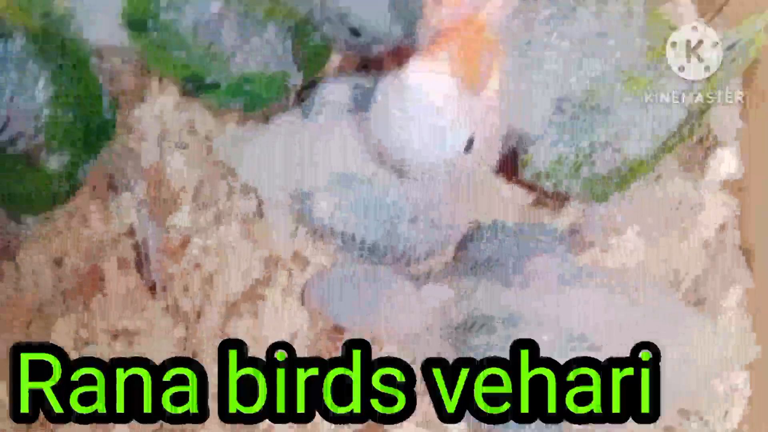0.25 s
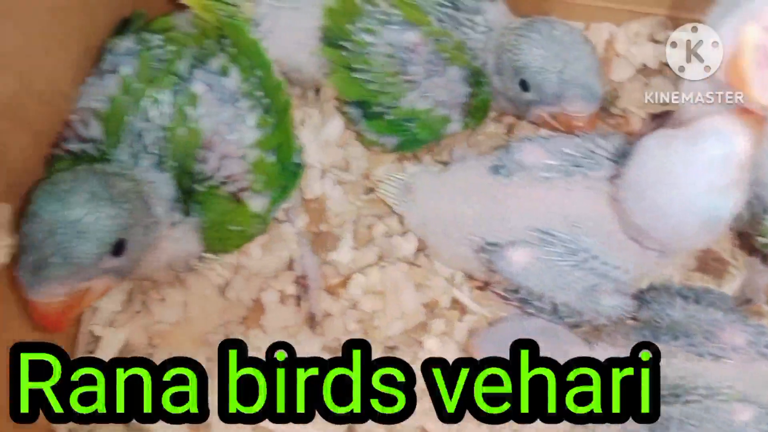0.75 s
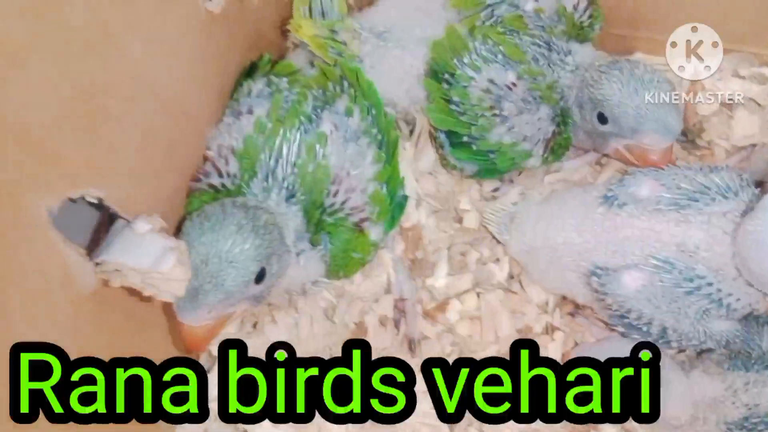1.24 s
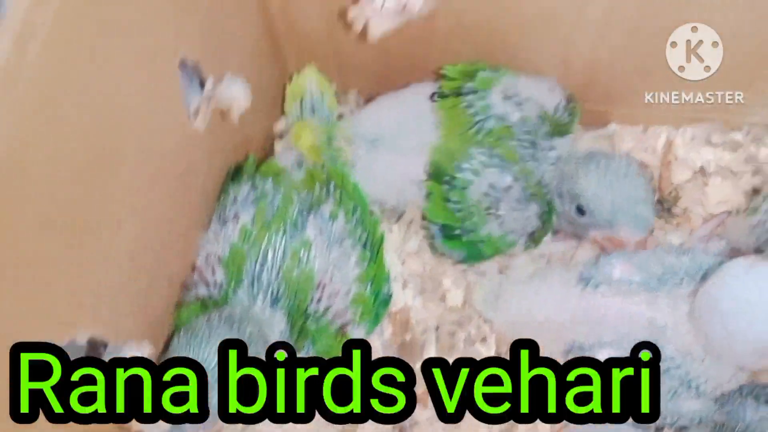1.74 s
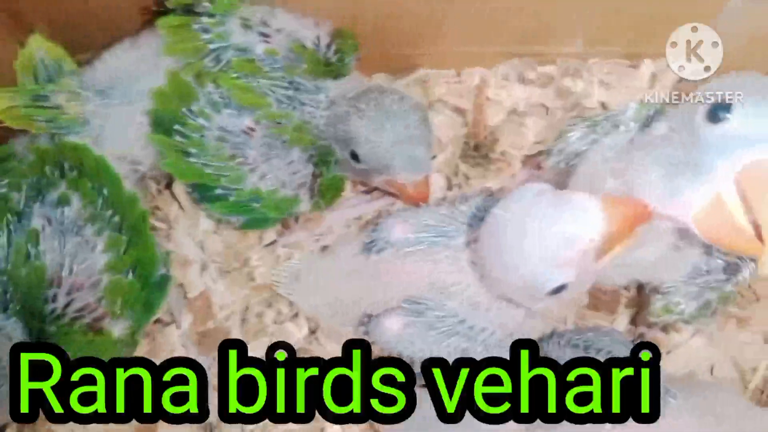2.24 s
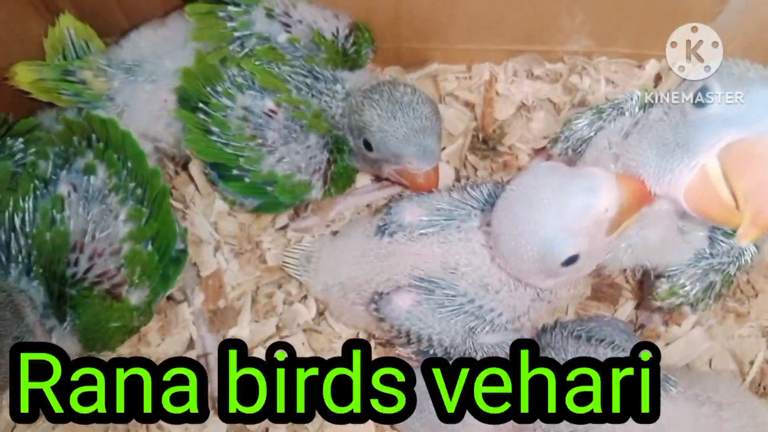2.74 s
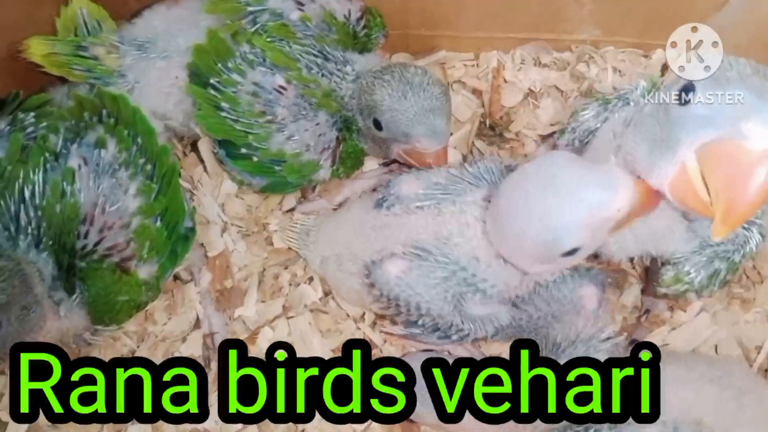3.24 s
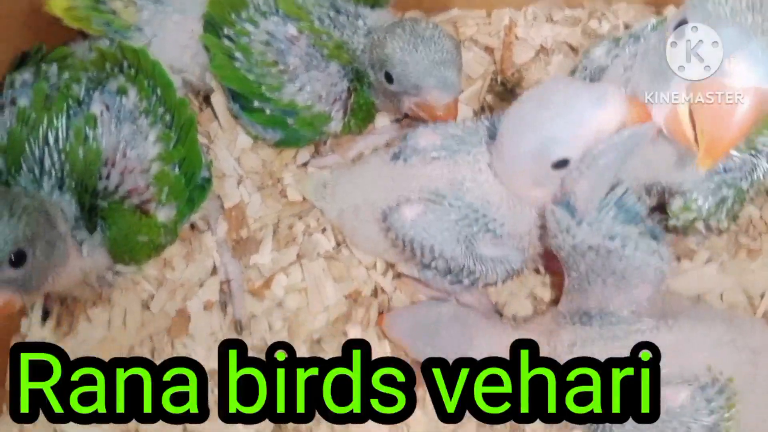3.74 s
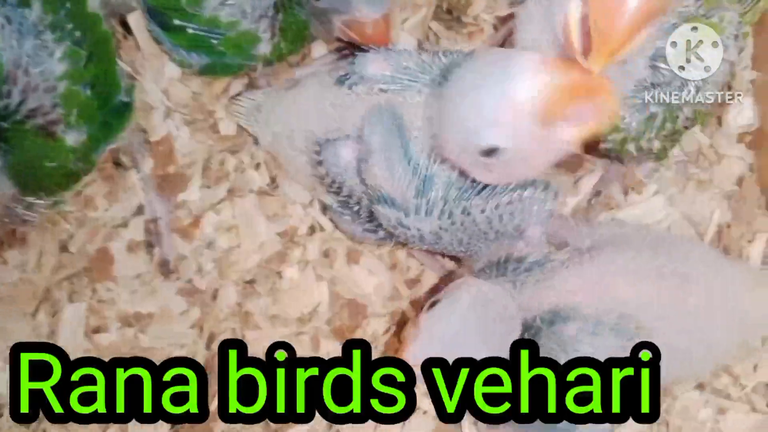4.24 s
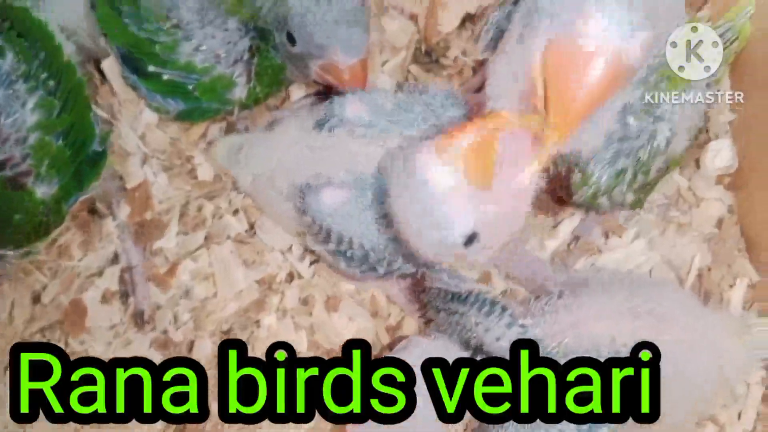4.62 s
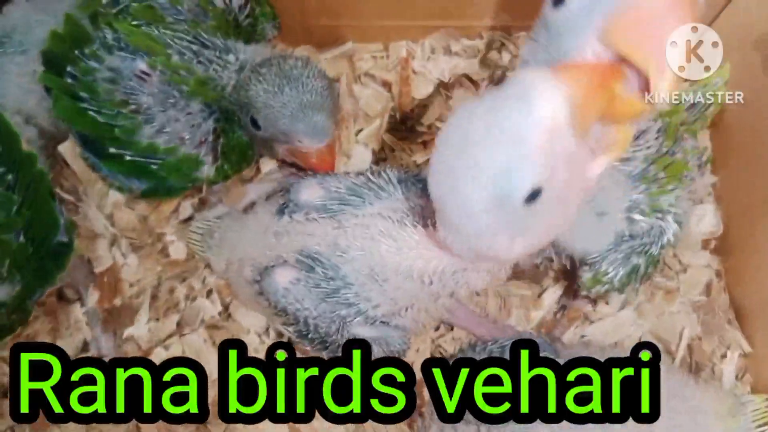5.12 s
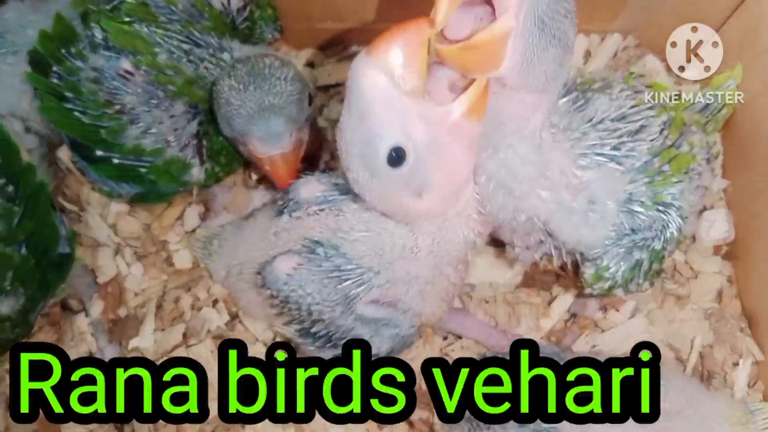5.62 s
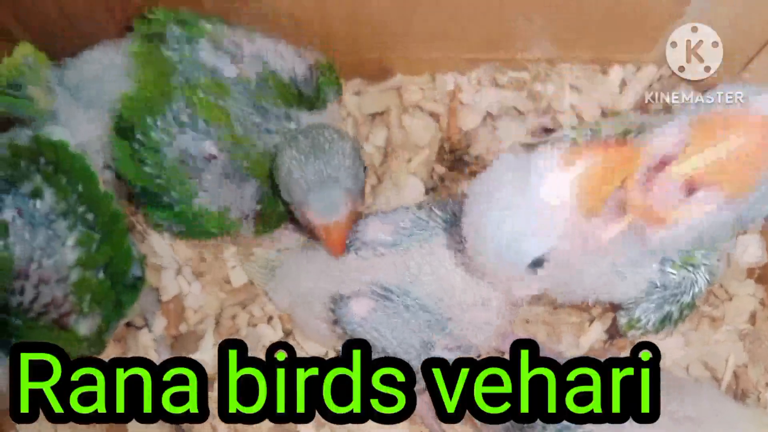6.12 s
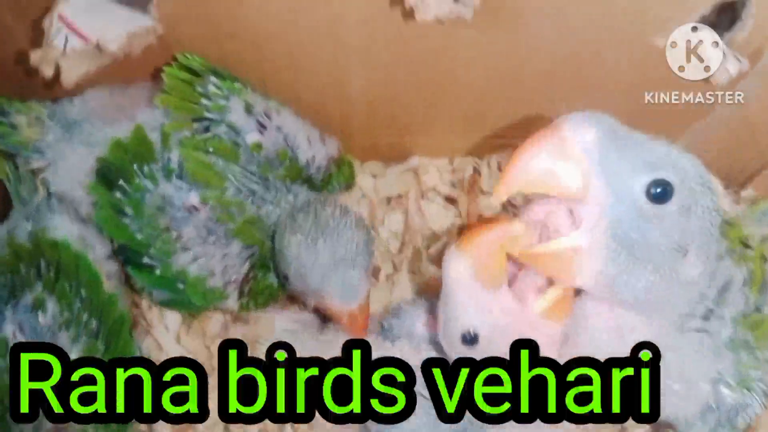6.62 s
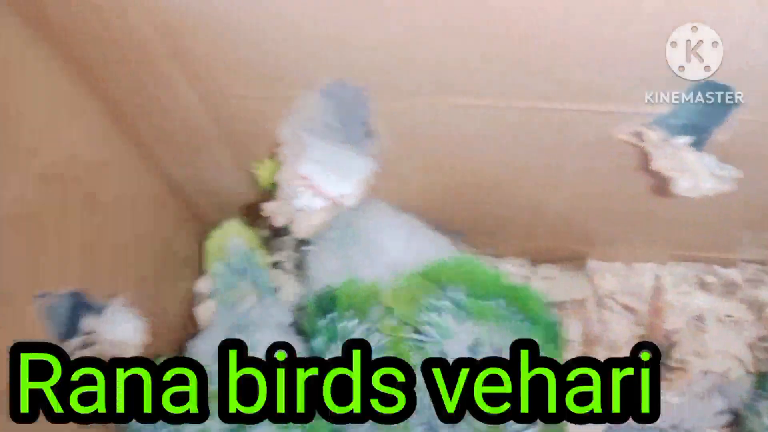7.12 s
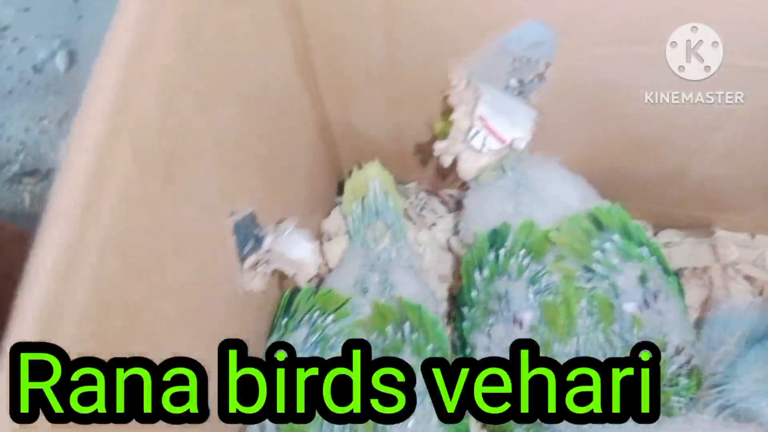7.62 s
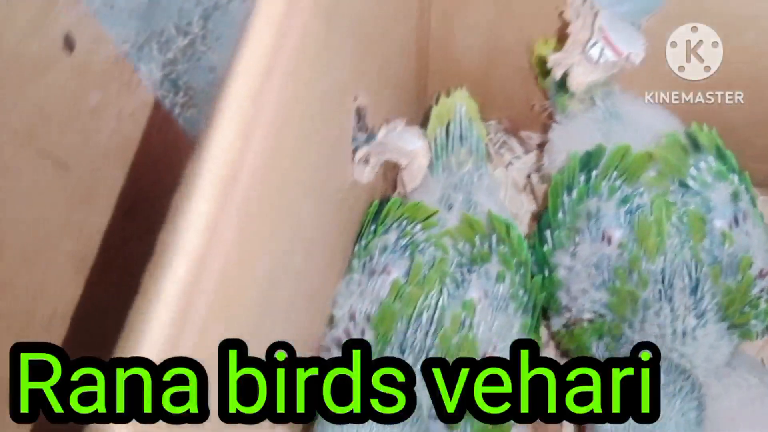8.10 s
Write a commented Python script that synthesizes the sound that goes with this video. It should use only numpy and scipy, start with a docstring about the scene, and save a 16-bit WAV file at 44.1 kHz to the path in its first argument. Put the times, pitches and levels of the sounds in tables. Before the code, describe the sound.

A brood of young parrots chatters without a break, mixing shrill, bending squeaks and longer whistles with raspy, breathy squawks. They sound close, with the short, tight echo of a cardboard box indoors. Behind them, over a faint low hum, come a rooster's rough crowing, a brief run of soft hen clucks, then more crowing. In the last seconds a quiet engine rumble grows as it approaches.

```python
"""Parakeet chicks beg in a cardboard box: gliding squeaks and longer whistles over bursts of hoarse rasp.
The whistles flutter; the rasp is uneven slaps of the voice membranes mixed with air, its hiss coloured
by the gaping beak. Farther off a rooster crows and a hen clucks, both harmonic tones with hoarse air.
Under it all lies a low hum; at the end an engine draws near, its pipe lifting the firing orders."""
import sys
import numpy as np
from scipy import signal
from scipy.fft import rfft, irfft
from scipy.io import wavfile
from scipy.ndimage import uniform_filter1d

SR = 44100
rng = np.random.default_rng(int(sys.argv[2]) if len(sys.argv) > 2 else 0)


def unload_audio(sound):
    """Save the sound as a 16-bit wav file, at the path given as the first command line argument."""
    columns = np.transpose(np.atleast_2d(sound))
    # keep every value between -1 and 1, then stretch to whole-number steps
    steps = np.round(np.clip(columns, -1, 1) * 32767)
    wavfile.write(sys.argv[1], SR, steps.astype(np.int16))


N = 368676
FRAME, HOP = 256, 64  # samples


def amp(db):
    """Decibels to gain."""
    return 10 ** (np.asarray(db) / 20)


def unit_rms(x):
    """Scales to unit rms."""
    return x / np.sqrt(np.mean(abs(x) ** 2) + 1e-20)


def add(mix, start_s, sound):
    """Mixes a sound in at start_s."""
    part = mix[round(start_s * SR):][:len(sound)]
    part += sound[:len(part)]


def curves(rows):
    """Linear interpolation of (t/s, ...) rows, one value a sample."""
    times_s, *columns = np.transpose(rows)
    t = np.arange(times_s[0], times_s[-1], 1 / SR)
    return [np.interp(t, times_s, column) for column in columns]


def phase_rad(hz):
    """Running phase of a frequency curve."""
    return 2 * np.pi * np.cumsum(hz) / SR


def colour(x, spectrum):
    """Filters by (f/Hz, level/dB) points, -80 dB outside them; unit rms."""
    points_hz, db = np.transpose(spectrum)
    hz = np.fft.rfftfreq(len(x), 1 / SR) + 1
    gain_db = np.interp(np.log(hz), np.log(points_hz), db, left=-80, right=-80)
    return unit_rms(irfft(rfft(x) * amp(gain_db), len(x)))


def wobble(count, width_hz):
    """Complex low-pass noise, unit power."""
    pole = np.exp(-2 * np.pi * width_hz / SR)
    settle = 900
    noise = rng.standard_normal(count + settle) + 1j * rng.standard_normal(count + settle)
    return unit_rms(signal.lfilter([1], np.poly([pole] * 3), noise)[settle:])


def patchy(x, gain_db, patch_db, patch_bins):
    """Applies a time-frequency gain plus drifting random patches."""
    spectra = signal.stft(x, SR, nperseg=FRAME, noverlap=FRAME - HOP)[2]
    patches = uniform_filter1d(rng.standard_normal(spectra.T.shape).T, size=patch_bins, axis=0)
    patches = unit_rms(uniform_filter1d(patches, size=24, axis=1))
    spectra *= amp(gain_db + patch_db * patches)
    return signal.istft(spectra, SR, nperseg=FRAME, noverlap=FRAME - HOP)[1][:N]


# Hum spectrum: f/Hz, level/dB
HUM_SPECTRUM = [(25, -41), (65, 3), (110, 1.5), (290, -18), (550, -20), (940, -20.5), (1200, -23)]


def hum():
    """Steady low noise of the surroundings."""
    return amp(-54.5) * colour(rng.standard_normal(N), HUM_SPECTRUM)


# Engine approach: t/s, firing rate/Hz, level/dB, order favoured by the pipe
ENGINE_RUN = [(6.819, 25.08, -56, 5), (6.93, 26, -56, 5), (7.22, 28.18, -52, 6.5), (7.32, 28.3, -51, 5),
              (7.46, 28.33, -40.5, 5), (7.53, 28.94, -57, 5), (7.59, 29.5, -40.5, 5), (7.67, 29.9, -48, 5),
              (7.74, 29.85, -41, 5), (7.88, 30.9, -34, 5), (7.97, 31.15, -42, 5.2), (8.031, 31.93, -35, 6),
              (8.2, 31.74, -34, 6), (8.36, 32.5, -35, 6)]
# Engine spectrum: order, level/dB
ENGINE_ORDERS = [(1, -32), (2, -11), (3, -17), (4, -12), (5, -12), (6, -9), (7, -13.5), (8, -17),
                 (9, -13.5), (10, -22), (12, -21), (22, -38)]


def engine(pipe_lift_db=12.5):
    """Wavering firing orders at rising speed; the exhaust pipe lifts the favoured one."""
    out = np.zeros(N)
    firing_hz, db, favoured = curves(ENGINE_RUN)
    phase = phase_rad(firing_hz)
    for order in range(1, 23):
        order_db = np.interp(order, *np.transpose(ENGINE_ORDERS))
        lift_db = pipe_lift_db * np.exp(-((order - favoured) / .7) ** 2)
        waver = 1 + (.25 + .16 * abs(order - favoured)) * wobble(len(phase), 7)
        tone = np.sqrt(2) * (waver * np.exp(1j * order * phase)).real
        add(out, ENGINE_RUN[0][0], amp(db + order_db + lift_db) * tone)
    return out


# Hoarse air of hen and rooster: f/Hz, level/dB
FOWL_SPECTRUM = [(330, -32), (500, -15), (600, -2.5), (700, -6.5), (810, -5.5), (980, -4), (1090, -5.5),
                 (1200, -4), (1400, -6.5), (1800, -7), (2600, -10)]


def hoarse_air(count):
    """Noisy part of a cluck or crow."""
    return colour(rng.standard_normal(count), FOWL_SPECTRUM)


# Clucks: t/s, relative level/dB, nominal second harmonic f/Hz
CLUCKS = [(1.925, -45, 680), (2.064, -41, 692), (2.221, -37.5, 650), (2.301, -44, 636), (2.376, -37, 633),
          (2.531, -39, 622), (2.699, -38.5, 633)]


def hen(cluck_s=.056):
    """Each cluck is a falling stack of harmonics 2-6 with a puff of air."""
    out = np.zeros(N)
    progress = np.linspace(0, 1, round(cluck_s * SR))
    envelope = np.sin(np.pi * progress) ** .5
    for start_s, db, second_hz in CLUCKS:
        phase = phase_rad(second_hz / 2 * (1.1 - .163 * progress))
        stack = (np.sin(2 * phase) + .86 * np.sin(3 * phase) + .5 * np.sin(4 * phase)
                 + 1.1 * np.sin(5 * phase - 1) + .4 * np.sin(6 * phase))
        add(out, start_s, amp(db - 4.5) * (stack + .97 * hoarse_air(len(phase))) * envelope)
    return out


# Hoarse stretches of crowing: start/s, end/s, attack/s, level/dB, sag/dB, first f/Hz, last f/Hz
CROWS = [(0, 0.523, .001, -29.5, -1, 786, 833), (.74, 1.878, 0.11, -28.5, -3, 829, 831),
         (2.739, 4.282, 0.2, -31.5, -0.5, 813.5, 784), (6.441, 8.02, 0.171, -31, -4.5, 776.3, 804),
         (8.0, 8.387, 0.2, -42.5, -3, 830, 845)]
# Pitched share of each stretch: at start, at end
CROW_PITCHED_SHARES = [(.3, .5), (.82, .45), (.12, .12), (.12, .12), (0, 0)]


def rooster_hoarse(release_s=.055, throb_hz=68):
    """The voice breaks: a rough, throbbing tone in air, with a sagging hold."""
    out = np.zeros(N)
    for crow, shares in zip(CROWS, CROW_PITCHED_SHARES):
        start_s, end_s, attack_s, hold_db, sag_db, first_hz, last_hz = crow
        db, hz = curves([(start_s, hold_db - 15.5, first_hz),
                         (start_s + attack_s, hold_db, first_hz),
                         (end_s - release_s, hold_db + sag_db, last_hz),
                         (end_s, hold_db - 42, last_hz)])
        count = len(hz)
        throb = 1 + .25 * np.cos(phase_rad(throb_hz + 6 * wobble(count, 12).real))
        roughness = 1 + 4 * wobble(count, 110)
        tone = unit_rms((throb * roughness * np.exp(1j * phase_rad(hz))).real)
        pitched = np.linspace(*shares, count)
        voice = np.sqrt(pitched) * tone + 1.123 * np.sqrt(1 - pitched) * hoarse_air(count)
        add(out, start_s, amp(db) * voice * signal.windows.tukey(count, .02))
    return out


# Clear crow notes, one list each: t/s, f/Hz, fundamental level/dB, second harmonic level/dB
CROW_NOTES = [
    [(6.24, 605, -40, -60), (6.254, 582, -27.5, -55), (6.264, 702, -38, -40), (6.346, 694, -35, -33),
     (6.385, 716, -32, -39), (6.42, 683, -29, -38)],
    [(6.53, 764, -79, -34), (6.59, 732, -31.5, -26), (6.7, 726, -47, -35), (6.73, 745, -47, -26),
     (6.83, 731, -33, -29.5)],
    [(7.24, 707, -32.5, -35), (7.36, 670, -41, -46), (7.43, 635, -32.5, -36), (7.57, 595, -30, -64),
     (7.63, 590, -40, -67)],
]


def rooster_clear():
    """Clear notes of the crow: three harmonics that shake together."""
    out = np.zeros(N)
    for rows in CROW_NOTES:
        hz, first_db, second_db = curves(rows)
        phasor = np.exp(1j * phase_rad(hz))
        shake = 1 + .38 * wobble(len(hz), 40)
        note = shake * (amp(first_db) * phasor + amp(second_db) * (phasor ** 2 + .31 * phasor ** 3))
        add(out, rows[0][0], np.sqrt(2) * note.real * signal.windows.tukey(len(hz), .1))
    return out


def box_reverb(x, rt60_s=.2):
    """Cardboard walls and the room beyond give a short, dense tail."""
    t = np.arange(round(.3 * SR)) / SR
    tail = rng.standard_normal(len(t)) * amp(-60 * t / rt60_s) * (t > .002)
    return signal.oaconvolve(x, tail / np.linalg.norm(tail))[:N]


def whistle(blur_hz, rows):
    """Fluttering tone on (t/s, f/Hz, level/dB) rows; if hoarse, a slower membrane adds side tones."""
    hz, db = curves(rows)
    count = len(hz)
    high = np.clip((hz - 4000) / 1500, 0, 1)  # high peeps are scratchier and carry their octave
    blur_hz = blur_hz * (1 + .3 * high.mean())
    clarity = np.clip(1 - blur_hz / 330, 0, 1)
    flutter = np.sqrt(clarity) + np.sqrt(1 - clarity) * wobble(count, 1.15 * blur_hz + 60)
    membrane_hz = rng.uniform(110, 260) * (1 + .15 * wobble(count, 20).real)
    flutter *= 1 + 1.3 * (1 - clarity) * np.cos(phase_rad(membrane_hz))
    phasor = np.exp(1j * phase_rad(hz))
    tone = np.sqrt(2) * (unit_rms(flutter) * (phasor + .24 * high * phasor ** 2)).real
    return amp(db) * tone * signal.windows.tukey(count, min(.01 * SR / count, 1))


def squeak_crowd(count, low_hz, pitch_ratio, blur_hz):
    """Short squeaks that rise and bend, scattered in time and pitch."""
    out = np.zeros(N)
    for onset, pitch, span, rise, softness, blur in rng.random((count, 6)):
        hz = low_hz * pitch_ratio ** pitch
        length_s, db = .02 + .045 * span, -6 * softness
        rows = [(0, hz, db),
                (length_s / 2, hz * (1 + .1 * rise), db),
                (length_s, hz * (1.1 - .1236 * rise), db - 7.5)]
        add(out, onset * N / SR, whistle(blur_hz + 130 * blur, rows))
    return unit_rms(out)


def rasp(air_gain, slaps_per_s=5000):
    """Uneven slaps of the voice membranes, mixed with air."""
    slaps = (rng.random(N) < slaps_per_s / SR) * rng.standard_normal(N)
    return unit_rms(slaps) + air_gain * rng.standard_normal(N)


# Rasp bursts: t/s, hold/s, hiss level/dB, top octave re hiss/dB, voice level/dB (all relative)
RASPS = [(0.002, 0.065, -31.5, -15, -22), (0.135, 0.052, -36.5, -11, -24), (0.221, 0.1, -29.5, -8.5, -23),
         (0.358, 0.039, -31, -8, -24.5), (0.447, 0.005, -32, -14, -22.5), (0.498, 0.015, -27, -9, -42.0),
         (0.582, 0.0042, -33.5, -5, -54), (0.66, 0.005, -28.5, -8, -29.5), (0.707, 0.078, -35, -4.5, -26),
         (0.822, 0.055, -27, -7, -21), (0.998, 0.04, -34, -5, -24), (1.073, 0.026, -31.5, -7.5, -44),
         (1.16, 0.0042, -30.5, -13, -26), (1.306, 0.16, -45, -24, -30.5), (1.496, 0.073, -30, -7.5, -20.5),
         (1.61, 0.11, -31, -8.5, -32), (1.793, 0.097, -35.5, -9, -25), (2.048, 0.0039, -38, -17, -31),
         (2.153, 0.069, -34, -10, -32), (2.274, 0.14, -34, -10.5, -26), (2.509, 0.05, -31, -13, -25),
         (2.615, 0.091, -32.5, -9, -31), (2.767, 0.009, -32.5, -6, -29.5), (2.84, 0.074, -33, -13, -25.5),
         (3.066, 0.042, -32, -10, -24), (3.19, 0.103, -30.5, -10.5, -30), (3.343, 0.096, -32, -10, -23),
         (3.528, 0.059, -36, -10, -26), (3.622, 0.052, -33.5, -8, -24.5), (3.756, 0.006, -42, -15, -48),
         (3.846, 0.091, -42, -14, -31), (4.015, 0.068, -36.5, -17, -35), (4.158, 0.07, -41, -20, -31.5),
         (4.274, 0.019, -34, -6.5, -24.5), (4.41, 0.091, -31, -10.5, -29.5), (4.642, 0.12, -44, -14, -30),
         (4.742, 0.14, -34.5, -7.5, -29.5), (4.83, 0.14, -36, -7, -28), (5.051, 0.022, -34, -11, -26),
         (5.157, 0.034, -38, -16, -31.5), (5.256, 0.11, -40.5, -13, -35), (5.416, 0.014, -50, -6, -32.5),
         (5.503, 0.009, -36, -15, -32.5), (5.637, 0.072, -30.5, -8, -25.5), (5.742, 0.12, -34.5, -14, -33),
         (5.952, 0.025, -40, -2, -32), (6.04, 0.069, -38.5, -15, -30.5), (6.136, 0.16, -36.5, -12, -25),
         (6.352, 0.051, -29.5, -7, -29.5), (6.484, 0.0035, -30, -19, -33), (6.548, 0.03, -30.5, -17, -25.5),
         (6.652, 0.005, -38.5, -17, -50), (6.734, 0.024, -32.5, -18, -30.5),
         (6.818, 0.12, -31, -11.5, -24.5), (7.009, 0.085, -35.5, -9, -22.5),
         (7.156, 0.055, -26.5, -12, -22.5), (7.245, 0.2, -32.5, -9.5, -24.5),
         (7.474, 0.017, -26.5, -7, -28.5), (7.598, 0.0036, -35.5, -17, -35),
         (7.722, 0.019, -40.5, -11, -34), (7.787, 0.073, -37.5, -16, -29.5),
         (7.929, 0.17, -31.5, -6.5, -26), (8.158, 0.13, -35.5, -10, -25)]


def rasp_envelope_db(band, rise_db_per_s, fall_db_per_s, rest_db):
    """One band's level per frame: bursts rise, hold and fall; powers add over a resting level."""
    t = np.arange(N // HOP + 2) * HOP / SR
    start_s, hold_s, hiss_db, top_re_hiss_db, voice_db = np.transpose(RASPS)[:, :, None]
    hold_db = {"voice": voice_db, "hiss": hiss_db, "top": hiss_db + top_re_hiss_db}[band]
    before_db = (start_s - t) * rise_db_per_s
    after_db = (t - start_s - abs(hold_s)) * fall_db_per_s
    burst_db = hold_db - np.maximum(np.maximum(before_db, after_db), 0)
    return 10 * np.log10((amp(burst_db) ** 2).sum(0) + amp(rest_db) ** 2)


# Breath spectrum: f/Hz, level/dB
HISS_SPECTRUM = [(3700, -27), (4600, -3), (5200, 3), (6300, -3), (7500, -2.5), (8600, -7.5), (9300, -5),
                 (10300, -14.5), (12500, -18.5), (13800, -18), (15600, -17.5)]
# Resonance of the gaping beak: t/s, f/Hz
BEAK_RESONANCE = [(0, 7300), (.3, 7140), (.45, 5930), (.75, 6900), (1.2, 6000), (1.4, 7450), (1.6, 5660),
                  (1.75, 6950), (1.85, 5940), (2.05, 7500), (2.35, 6940), (2.5, 6100), (2.95, 5960),
                  (3.15, 6660), (3.25, 5750), (3.35, 6880), (3.65, 5900), (3.8, 6750), (4.2, 6200),
                  (4.65, 7200), (4.75, 5930), (4.85, 7260), (5.15, 6400), (5.8, 6750), (6.75, 5950),
                  (7.5, 6550), (7.9, 6840), (8.36, 6400)]


def chick_hiss(beak_lift_db=6, beak_width_ratio=.11):
    """Hiss and peeps pass the moving beak resonance; the top starts and dies faster, and flickers."""
    air = colour(rasp(air_gain=1.5), HISS_SPECTRUM)
    peeps = squeak_crowd(count=320, low_hz=5200, pitch_ratio=1.42, blur_hz=60)
    hiss_db = rasp_envelope_db("hiss", rise_db_per_s=594, fall_db_per_s=183, rest_db=-71)
    top_db = rasp_envelope_db("top", rise_db_per_s=800, fall_db_per_s=248, rest_db=-77)
    top_db += 7  # brightens the top octave of the hiss
    hz = np.fft.rfftfreq(FRAME, 1 / SR)[:, None]
    frame_s = np.arange(len(hiss_db)) * HOP / SR
    beak_hz = np.interp(frame_s, *np.transpose(BEAK_RESONANCE))
    resonance = sum(np.exp(-((hz / (k * beak_hz) - 1) / beak_width_ratio) ** 2) for k in (1, 2))
    flicker_db = 1.5 * unit_rms(uniform_filter1d(rng.standard_normal(len(frame_s)), size=30))
    top_weight = np.clip((hz - 8500) / 1800, 0, 1)
    gain_db = hiss_db - 3.5 + beak_lift_db * resonance + top_weight * (top_db - hiss_db + flicker_db)
    return patchy(.8 * air + .55 * peeps, gain_db, patch_db=3.5, patch_bins=5)


# Beak, box and microphone response: f/Hz, level/dB
BROOD_SPECTRUM = [(1000, -35), (1300, -11.5), (1700, -7), (2000, -4), (2450, 0.5), (3400, 0.5),
                  (4000, -6.5), (4700, -19.5)]


def chick_chorus():
    """Overlapping squeaks and a rasp share one colour and swell together."""
    squeaks = squeak_crowd(count=800, low_hz=1300, pitch_ratio=3.3, blur_hz=70)
    voices = colour(squeaks + 1.2 * rasp(air_gain=1.6), BROOD_SPECTRUM)
    gain_db = rasp_envelope_db("voice", rise_db_per_s=149, fall_db_per_s=94, rest_db=-61)
    return patchy(voices, gain_db, patch_db=2.5, patch_bins=2)


# Squeaks: start/s, peak/s, end/s, start f/Hz, peak f/Hz, end f/Hz, peak level/dB, blur/Hz
SQUEAKS = [(0.024, 0.039, .12, 3344, 3250, 3340, -16.5, 92),
           (0.248, 0.261, .292, 2290, 2450, 2680, -13, 100),
           (0.306, 0.401, .5, 1650, 1755, 1930, -23.5, 190),
           (0.334, 0.377, .397, 2106, 2440, 2640, -17, 140),
           (0.372, 0.39, .425, 6860, 6920, 6950, -27, 120), (0.42, 0.434, .56, 2096, 2102, 2440, -20, 135),
           (0.434, 0.456, .478, 5100, 5780, 5500, -25.5, 140),
           (0.492, 0.51, .53, 5370, 5580, 6240, -30, 120), (0.634, 0.724, .745, 1630, 2440, 2570, -23, 130),
           (0.639, 0.65, .668, 5880, 5950, 5910, -26, 74), (.641, 0.67, .708, 3610, 3630, 3620, -26, 64),
           (0.725, 0.742, .778, 3210, 3210, 3100, -18, 140),
           (0.812, 0.876, .92, 3070, 2720, 2260, -16, 160), (0.957, .967, 1.04, 3170, 3300, 4270, -27, 190),
           (0.987, 1.037, 1.075, 1905, 2360, 2800, -14.5, 110),
           (1.147, 1.18, 1.215, 1400, 1196, 1030, -30, 40),
           (1.488, 1.514, 1.549, 2100, 2260, 2380, -25, 210),
           (1.541, 1.578, 1.59, 2900, 3460, 3500, -22, 200),
           (1.84, 1.898, 1.975, 1284, 1670, 1750, -27.5, 235),
           (2.332, 2.369, 2.45, 1898, 2046, 2570, -23.5, 140),
           (2.513, 2.547, 2.589, 2600, 2360, 2260, -22, 170),
           (2.615, 2.637, 2.714, 6160, 6090, 6070, -29, 55),
           (2.649, 2.685, 2.715, 2364, 2320, 2230, -29.5, 100),
           (2.77, 2.861, 2.885, 1560, 2280, 2420, -23, 140),
           (2.856, 2.884, 2.925, 5850, 5990, 5900, -30.5, 110),
           (2.911, 2.996, 3.015, 1783, 1877, 1900, -18.5, 145),
           (3.236, 3.276, 3.296, 5400, 5700, 5660, -27, 120),
           (3.543, 3.572, 3.6, 5900, 6080, 6030, -28, 170),
           (3.35, 3.39, 3.405, 10700, 7000, 5670, -32.5, 20),
           (3.525, 3.581, 3.655, 2070, 2183, 1984, -20, 120),
           (3.652, 3.731, 3.805, 1670, 1830, 1864, -26, 160),
           (4.052, 4.1, 4.132, 3090, 3110, 2980, -26.5, 190),
           (4.243, 4.27, 4.31, 3730, 3550, 3530, -23.5, 110),
           (4.281, 4.302, 4.388, 2866, 2896, 2900, -24, 130),
           (4.34, 4.433, 4.465, 1280, 1370, 1310, -36, 63),
           (4.377, 4.377, 4.46, 2750, 2792, 2780, -23.5, 110),
           (4.488, 4.505, 4.54, 3700, 3700, 3680, -27, 270),
           (4.703, 4.765, 4.814, 1730, 2510, 2410, -20, 84), (4.761, 4.8, 4.859, 1260, 1270, 1256, -36, 18),
           (4.774, 4.809, 4.83, 1786, 2210, 2300, -19, 86), (4.82, 4.838, 4.88, 2770, 2930, 2890, -20, 110),
           (4.839, 4.863, 4.916, 2230, 2520, 2360, -14.5, 120),
           (4.911, 4.922, 4.957, 3090, 3084, 2950, -18.5, 92),
           (4.933, 4.96, 5.02, 2393, 2106, 2170, -21.5, 120),
           (5.009, 5.05, 5.08, 3450, 3380, 3400, -28, 100),
           (5.168, 5.198, 5.258, 1364, 1313, 1285, -39.5, 33),
           (5.186, 5.232, 5.27, 3480, 3460, 3430, -28.5, 110),
           (5.56, 5.607, 5.645, 1690, 2070, 2650, -27, 69),
           (5.632, 5.665, 5.72, 2920, 3235, 3300, -25, 150),
           (5.731, 5.752, 5.778, 2870, 3020, 2900, -21.5, 89),
           (5.596, 5.665, 5.71, 1236, 1276, 1265, -38.5, 27),
           (5.697, 5.741, 5.79, 2450, 2424, 2645, -20, 140),
           (6.544, 6.574, 6.62, 1800, 1813, 1930, -24, 170),
           (6.61, 6.666, 6.708, 1950, 2247, 1870, -19, 210),
           (6.645, 6.68, 6.716, 2810, 2770, 2780, -21.5, 79),
           (6.758, 6.811, 6.908, 3680, 3430, 2880, -23, 120),
           (6.821, 6.877, 6.945, 1540, 1662, 1580, -23.5, 140),
           (7.136, 7.157, 7.192, 3570, 3680, 3700, -26, 92),
           (7.147, 7.178, 7.225, 6240, 5930, 5500, -28, 100),
           (7.219, 7.246, 7.245, 3080, 3150, 3300, -16, 150),
           (7.254, 7.305, 7.33, 3630, 3487, 3500, -22.5, 97),
           (8.172, 8.234, 8.246, 2016, 2524, 2600, -16.5, 140),
           (8.192, 8.2, 8.217, 6330, 6370, 6470, -24, 97),
           (8.195, 8.216, 8.275, 2180, 2160, 2030, -18.5, 120),
           (8.264, 8.317, 8.347, 2065, 2160, 2135, -19.5, 200)]
# Longer whistles: blur/Hz, rows of (t/s, f/Hz, level/dB)
LONG_WHISTLES = [(105, [(.082, 1754, -23), (.137, 1870, -19), (.16, 2406, -13), (.182, 2960, -16.5),
                 (.218, 2255, -18.5)]), (25, [(1.05, 2906, -16), (1.066, 3050, -14), (1.125, 3050, -14),
                 (1.192, 3020, -18), (1.222, 2630, -24.5)]), (60, [(1.42, 3640, -18.5), (1.45, 3770, -35),
                 (1.492, 3780, -21.5), (1.529, 3650, -33)]), (140, [(2.961, 2155, -22), (2.998, 2202, -29),
                 (3.038, 2734, -19), (3.063, 2754, -15.5), (3.1, 2740, -20.5), (3.14, 2140, -21),
                 (3.19, 2054, -20)]), (142, [(3.28, 1695, -31), (3.377, 2577, -21), (3.407, 2300, -36),
                 (3.432, 2290, -17.5), (3.47, 2850, -21.5)]), (126, [(6.021, 1537, -41), (6.066, 1940, -22),
                 (6.082, 2050, -28), (6.088, 2367, -16.5), (6.114, 2800, -17), (6.131, 2744, -15),
                 (6.144, 2350, -16.5), (6.168, 1990, -21), (6.2, 2845, -14.5), (6.223, 2415, -17),
                 (6.268, 1720, -24.5)]), (134, [(7.121, 1650, -26), (7.191, 2056, -20.5),
                 (7.241, 2647, -21.5), (7.31, 2610, -19.5), (7.366, 2630, -17.5), (7.406, 2410, -13),
                 (7.448, 2077, -32)]), (39.6, [(7.56, 2158, -34.5), (7.7, 2172, -35.5), (8, 2150, -25),
                 (8.14, 2146, -39), (8.3, 2147, -26)]), (144, [(7.792, 1810, -31), (7.837, 2297, -16.5),
                 (7.857, 2486, -22), (7.877, 3020, -19.5), (7.912, 2170, -36), (7.927, 2025, -22),
                 (7.957, 2434, -14.5), (7.992, 2445, -25)])]


def chick_calls(entry_db=-10.5, exit_db=-7.5):
    """Squeaks that swell and fade; longer whistles, some bending several times, some held on one pitch."""
    out = np.zeros(N)
    for start_s, peak_s, end_s, start_hz, peak_hz, end_hz, db, blur_hz in SQUEAKS:
        rows = [(start_s, start_hz, db + entry_db), (peak_s, peak_hz, db), (end_s, end_hz, db + exit_db)]
        add(out, start_s, whistle(blur_hz, rows))
    for blur_hz, rows in LONG_WHISTLES:
        add(out, rows[0][0], whistle(blur_hz, rows))
    return out


def scene():
    """Bird calls with reverb, plus dry chorus, hiss, engine and hum; mono."""
    calls = chick_calls() + rooster_hoarse() + rooster_clear() + hen()
    background = hum()
    reverb = amp(-8.5) * box_reverb(calls)
    return (calls + reverb + chick_chorus() + chick_hiss() + engine() + background)[None]


# Bands cancelled by sound bouncing back to the microphone: f/Hz, width/Hz, depth/dB
NOTCHES = [(4828, 255, 10.5), (9330, 490, 14.5)]


def record(dry, low_cut_hz=40, band_limit_hz=15680):
    """Reflection notches, then the recorder's bass roll-off and band limit."""
    hz = np.fft.rfftfreq(N, 1 / SR)
    dip_db = sum(db * np.exp(-((hz - centre_hz) / width_hz) ** 2) for centre_hz, width_hz, db in NOTCHES)
    bass_gain = 1 / np.sqrt(1 + (low_cut_hz / (hz + 1)) ** 4)
    heard = irfft(rfft(dry) * amp(-dip_db) * bass_gain, N)
    lowpass = signal.firwin(1023, band_limit_hz, window=("kaiser", 9), fs=SR)
    return signal.oaconvolve(heard, lowpass[None], "same")


dry = scene()
out = record(dry)
unload_audio(out)
```